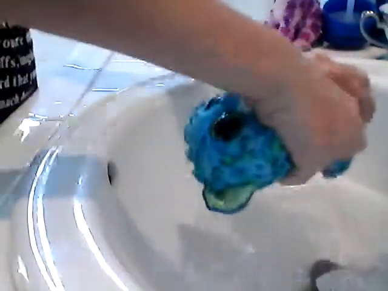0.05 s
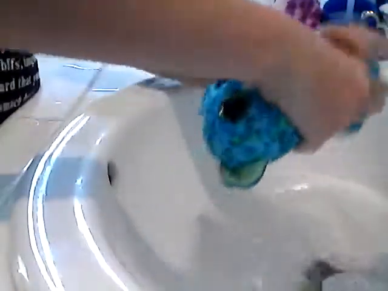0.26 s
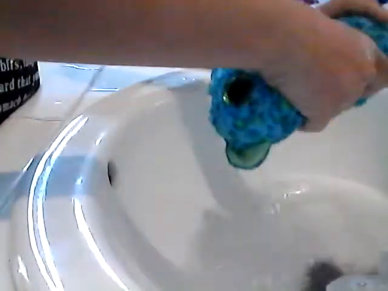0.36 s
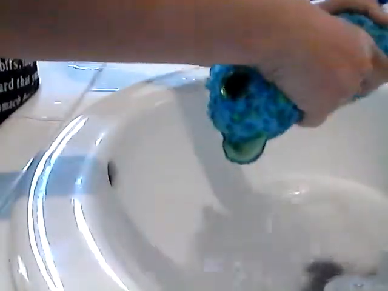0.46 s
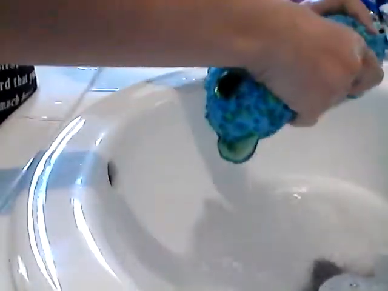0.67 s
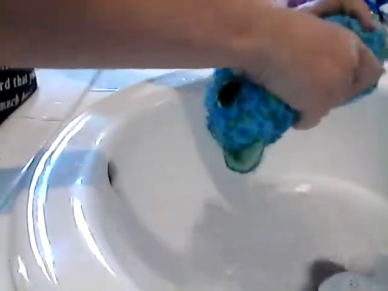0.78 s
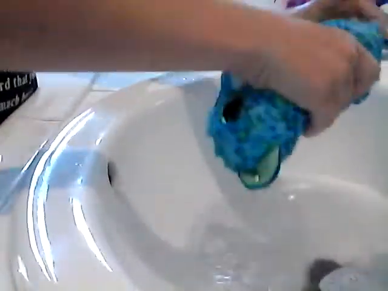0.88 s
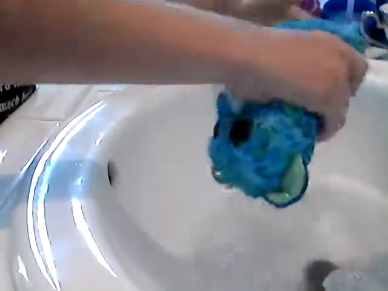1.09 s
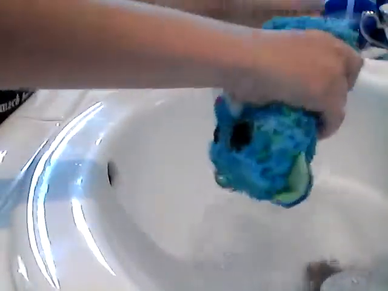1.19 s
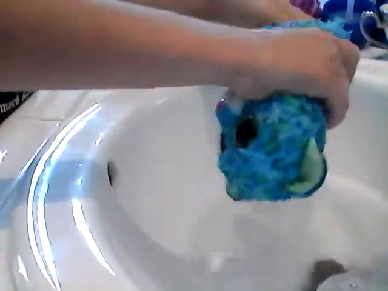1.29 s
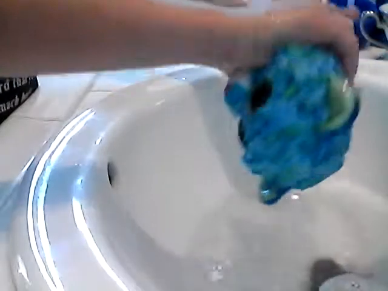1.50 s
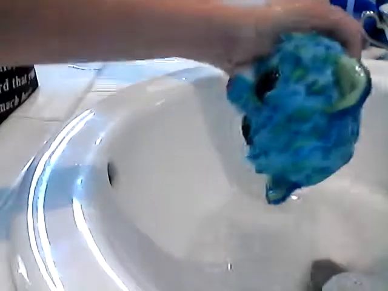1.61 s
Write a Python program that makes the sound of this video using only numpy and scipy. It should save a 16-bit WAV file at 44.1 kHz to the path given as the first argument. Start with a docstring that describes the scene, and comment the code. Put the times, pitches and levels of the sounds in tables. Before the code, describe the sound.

Water dribbles and plops from a squeezed wet plush toy into a bathroom sink.

```python
"""A wet plush toy is wrung out over a little water in the sink of a small, hard bathroom.
From the start, microphone hiss, hum and a thin whine lie under a faint ring and a dribble of droplets.
The fabric is squeezed and large drops fall: each traps an air bubble that resonates, most rising in pitch
as they near the surface, while fine spray ticks in the basin. After about a second the dribble thins to
single plops, and last come a soft bump and a small splash."""
import sys
import numpy as np
from scipy import signal
from scipy.fft import rfft, irfft
from scipy.io import wavfile

SR = 44100
rng = np.random.default_rng(int(sys.argv[2]) if len(sys.argv) > 2 else 0)


def wrap_up_sound(samples):
    """Save the sound to the file named by the first command line argument, as 16-bit audio."""
    columns = np.atleast_2d(samples).T
    # keep every value between -1 and 1, then stretch to whole-number steps
    tamed = np.clip(columns, -1, 1)
    steps = np.round(tamed * 32767).astype(np.int16)
    wavfile.write(sys.argv[1], SR, steps)


N = 72765
TIME = np.arange(N) / SR
AGE = np.arange(int(0.09 * SR)) / SR   # seconds since a drop landed


def from_db(db):
    """Amplitude ratio of a level in decibels."""
    return 10 ** (np.asarray(db) / 20)


def rms_one(x):
    """Normalisation to unit rms."""
    return x / np.sqrt(np.mean(x ** 2) + 1e-20)


def add(out, start_s, sound):
    """Superposition: a sound adds to the mix from start_s on."""
    i = int(np.clip(start_s * SR, 0, N - 1))
    out[i:i + len(sound)] += sound[:N - i]


def filtered(x, hz, kind, order=2):
    """Butterworth filter, maximally flat in its passband."""
    return signal.sosfilt(signal.butter(order, np.clip(hz, 10, .45 * SR), kind, fs=SR, output="sos"), x)


def decay(t, t60_s):
    """Exponential damping, by 60 dB in t60_s."""
    return np.exp(-np.log(1000) * t / t60_s)


# spectrum of the noise floor: frequency_hz, relative_density_db
NOISE_SPECTRUM = [(15, -69), (25, 3), (130, -2), (170, -1.5), (242, -3), (285, -5), (354, -6), (394, -6.5),
                  (1290, -14), (1400, -11), (3080, -17), (7710, -19.5), (10100, -22), (14800, -24),
                  (16000, -17)]
# mains hum and electrical whine: pitch_hz, level_db
HUM_TONES = [(60, -53.5), (110, -54.5), (8000, -52), (15000, -48.5)]
def background(noise_db=-41):
    """Stationary noise: room rumble and microphone hiss form a continuum, hum and whine a line spectrum."""
    corner_hz, density_db = np.transpose(NOISE_SPECTRUM)
    bin_hz = np.arange(N // 2 + 1) * SR / N
    colour = from_db(np.interp(np.log(bin_hz + 1), np.log(corner_hz), density_db))
    noise = rms_one(irfft(rfft(rng.standard_normal(N)) * colour, N))
    tones = sum(np.sqrt(2) * from_db(db) * np.sin(2 * np.pi * (hz * TIME + rng.random()))
                for hz, db in HUM_TONES)
    return from_db(noise_db) * noise + tones


# faint rings over the basin: start_s, pitch_hz, level_db, t60_s
RINGS = [(0, 2157, -48, 0.47), (0.215, 2647, -28, 0.23), (0.3025, 2160, -40, 0.65),
         (0.445, 1649, -19, 0.22)]
def lingering_rings(attack_s=0.002):
    """Lightly damped oscillation: thin tones swell quickly and die away slowly."""
    out = np.zeros(N)
    attack = 1 - np.exp(-TIME / attack_s)
    for start_s, hz, db, t60_s in RINGS:
        add(out, start_s, from_db(db) * attack * decay(TIME, t60_s) * np.sin(2 * np.pi * hz * TIME))
    return out


def bubble(hz, life_s, rise_octaves, t60_cycles=212, attack_s=0.00008):
    """Minnaert resonance: trapped air rings, gliding ever faster in pitch until the bubble surfaces."""
    life_spent = np.minimum(AGE / life_s, 2)
    pitch_hz = np.minimum(hz * 2 ** (rise_octaves * life_spent ** 2), SR / 2)
    attack = 1 - np.exp(-AGE / attack_s)
    surfacing = np.exp(-life_spent ** 4)
    envelope = attack * decay(AGE, t60_cycles / hz) * surfacing
    return envelope * np.cos(2 * np.pi * np.cumsum(pitch_hz) / SR)


def impact(band_hz, t60_s, order):
    """Impact noise: water striking water gives a brief burst with a broad spectrum."""
    return filtered(rng.standard_normal(len(AGE)) * decay(AGE, t60_s), band_hz, "band", order)


def tick(hz, fizz_db=-6, attack_s=0.00006):
    """Impulse excitation: a tiny droplet gives a very short ring and a puff of fizz."""
    ring = decay(AGE, t60_s=0.0041) * np.sin(2 * np.pi * hz * AGE)
    fizz = from_db(fizz_db) * impact(band_hz=(9830, 14400), t60_s=0.013, order=2)
    return (1 - np.exp(-AGE / attack_s)) * (ring + fizz)


def scatter(contour, per_s, base_db, low_hz, high_hz, spread_db=2):
    """Poisson process: random droplets (start_s, pitch_hz, gain) whose levels follow a contour."""
    start_s = TIME[rng.random(N) < per_s / SR]
    hz = low_hz * (high_hz / low_hz) ** rng.random(len(start_s))
    mean_db = base_db + np.interp(start_s, *np.transpose(contour))
    jitter_db = spread_db * np.clip(rng.standard_normal(len(start_s)), -2, 2)
    return zip(start_s, hz, from_db(mean_db + jitter_db))


# strength of the dribble: time_s, relative_level_db
FLOW = [(0.1, -5.5), (.18, -6), (.3, -1), (.41, -9.5), (.57, -5), (.66, -11), (.79, 2.5), (.88, -0.5),
        (.97, -5.5), (1.12, -13), (1.47, -20), (1.54, -5.5), (1.65, -10.5)]
def dribble(life_cycles=17.9):
    """Incoherent sources: many faint chirping bubbles and ticks of mist add up to a trickle."""
    out = np.zeros(N)
    for start_s, hz, gain in scatter(FLOW, per_s=260, base_db=-41.5, low_hz=1802, high_hz=4406):
        add(out, start_s, gain * bubble(hz, life_cycles / hz, rise_octaves=0.22))
    for start_s, hz, gain in scatter(FLOW, per_s=100, base_db=-33.5, low_hz=7860, high_hz=15750):
        add(out, start_s, gain * tick(hz))
    return out


# soft swells of noise: peak_s, half_width_s, level_db, low_hz, high_hz
SWELLS = [(0.181, 0.02, -38.5, 513, 860), (0.181, 0.012, -36.5, 1340, 5130), (0.782, 0.1, -47.5, 584, 850),
          (1.525, 0.02, -41.5, 161, 407), (1.569, 0.015, -35.5, 54.4, 147),
          (1.566, 0.045, -56.5, 1910, 6000)]
def soft_swells():
    """Amplitude-modulated noise: wet fabric handled, a low watery plop, a bump and a closing splash."""
    out = np.zeros(N)
    for peak_s, half_width_s, db, low_hz, high_hz in SWELLS:
        swell = np.exp(-((TIME - peak_s) / half_width_s) ** 2 / 2)
        noise = rms_one(filtered(rng.standard_normal(N), [low_hz, high_hz], "band"))
        out += from_db(db) * swell * noise
    return out


# large drops and their bubbles: start_s, pitch_hz, level_db, life_ms, rise_octaves, slap_re_bubble_db
DROPS = [ (0.1857, 3230, -22, 4.2, -0.16, -5), (.2138, 2760, -12, 1.86, -0.16, -14),
         (0.2235, 5580, -23, 3.4, -0.038, -1.5), (0.2735, 4310, -16.5, 3.9, 0.067, -10),
         (.3021, 2270, -21, 2.9, 0.057, -5), (0.4367, 1593, -11, 32, 0.06, -18),
         (0.4367, 1668, -10.5, 5.2, -0.046, -18.5), (0.469, 2470, -31.5, 18, 0.31, -30),
         (0.441, 4140, -26.5, 8.1, 0.22, -21), (.4470, 5450, -25, 1.8, 0.37, -6),
         (0.458, 1780, -23.5, 11, 0.38, -28), (0.4854, 6550, -25, 1.6, 0.15, -2.5),
         (0.5745, 4650, -16, 2.6, -0.051, -7), (0.5752, 3790, -20, 4.7, -0.11, -17),
         (.6000, 1396, -13.5, 8.5, 0.7, -48), (0.6148, 1291, -10.5, 12, 0.017, -19),
         (0.6148, 3586, -15, 7.8, 0.6, -9), (0.62, 1581, -11, 9.6, 0.017, -42),
         (0.633, 1687, -24, 13, 0.43, -30), (0.6647, 1770, -26, 3.1, 0.51, -19),
         (.6660, 2230, -33, 14, 0.37, -25), (0.6977, 1246, -25, 25, 0.37, -25),
         (.7120, 1156, -23.5, 9.5, -0.26, -21), (0.7059, 3690, -28.5, 3.9, 0.14, -2),
         (0.7192, 5050, -31, 8.2, -0.41, -8), (0.726, 1092, -30, 16, -0.14, -25),
         (0.737, 1095, -19.5, 8.4, 0.31, -24), (0.7488, 1100, -18.5, 11.4, 0.74, -35),
         (0.759, 1725, -28.5, 20, -0.17, -36), (0.7774, 1540, -21, 4.4, 0.2, -28),
         (0.781, 2440, -30.5, 13, 0.57, -20), (0.7825, 1481, -14, 6.5, 0.08, -33),
         (0.816, 2570, -32.5, 7.5, 0.4, -28), (0.8265, 2100, -26, 3, -0.2, -8),
         (0.8388, 1417, -21, 21, 0.28, -7.5), (0.8634, 1502, -26.5, 49, 0.37, -12),
         (0.872, 2390, -34, 4.4, 0.039, -20), (0.881, 3360, -30, 5.9, 0.013, -18),
         (0.9251, 4670, -32, 11, -0.24, -2), (0.9332, 3570, -28, 4.7, 0.22, -20),
         (.9350, 1800, -27.5, 4.5, 0.083, -9), (0.9449, 6170, -20, 1.45, -0.17, -8.5),
         (0.966, 2240, -33, 8, -0.00017, -20), (1.008, 4650, -33, 5, 0.19, -20),
         (1.031, 3270, -28, 4.5, -0.081, -17), (1.1299, 1388, -25.5, 16, 0.017, -31),
         (1.3229, 1745, -25, 5.4, 0.65, -16), (1.3228, 1289, -11, 25.2, -0.275, -19.5),
         (1.331, 3800, -29, 5.6, -0.35, -22), (1.581, 6320, -33.5, 2.7, 0.06, -4)]
def drops(low_cut_hz=1060, knock_db=-3.5, knock_band_hz=(470, 646)):
    """Air entrainment: each drop slaps the water and traps a bubble; the basin adds a hollow knock."""
    out = np.zeros(N)
    for start_s, hz, db, life_ms, rise_octaves, slap_db in DROPS:
        slap = from_db(slap_db) * impact(band_hz=(1520, 9900), t60_s=0.031, order=1)
        add(out, start_s, from_db(db) * (bubble(hz, life_ms / 1000, rise_octaves) + slap))
    knock = from_db(knock_db) * filtered(out, knock_band_hz, "band")
    return filtered(out, low_cut_hz, "high", order=4) + knock


# fine spray landing: start_s, pitch_hz, level_db
SPRAY_HITS = [ (0.2377, 12000, -17), (0.2937, 14800, -20.5), (0.322, 12200, -23), (.3325, 10900, -16.5),
              (0.3814, 8700, -24.5), (0.4858, 12600, -17), (0.5709, 8540, -14.5), (0.5736, 12600, -11.5),
              (0.614, 10900, -19), (0.6496, 11800, -5.5), (0.6512, 11950, -15), (.6625, 12000, -22),
              (.6870, 12500, -23), (0.707, 12500, -27), (0.7194, 9600, -22), (0.8188, 12500, -11),
              (.8638, 10350, -14), (.9630, 10600, -23), (.9926, 13300, -25), (1.060, 9800, -27),
              (1.0805, 10400, -19.5), (1.111, 12800, -31)]
def spray():
    """Short transients: fine spray strikes the wet basin in bright ticks."""
    out = np.zeros(N)
    for start_s, hz, db in SPRAY_HITS:
        add(out, start_s, from_db(db) * tick(hz))
    return out


# early reflections off the basin: delay_ms, gain
REFLECTIONS = [(.9, -0.12), (2.3, -0.085), (3.6, -0.15), (13.4, 0.2)]
def room(x, crossover_hz=4400, build_up_s=0.007):
    """Reverberation: close reflections, then the bathroom's diffuse tail, shorter in the treble."""
    early = np.zeros(N)
    for delay_ms, gain in REFLECTIONS:
        add(early, delay_ms / 1000, gain * x)
    t = TIME[:SR // 2]
    onset = np.clip(t / build_up_s - 0.5, 0, 1)
    tail = np.zeros(len(t))
    for kind, t60_s, db in (("low", 0.33, -9), ("high", 0.27, -9.5)):
        echoes = rng.standard_normal(len(t)) * decay(t, t60_s) * onset
        tail += from_db(db) * filtered(echoes / np.linalg.norm(echoes), crossover_hz, kind)
    return early + signal.fftconvolve(x, tail)[:N]


def scene():
    """Superposition of all sources in one channel; only drops, spray and dribble excite the room."""
    noises = background() + soft_swells()
    water = drops() + spray() + dribble()
    return (noises + water + room(water) + lingering_rings())[None]


def record(dry, cutoff_hz=15900):
    """Band limiting: a steep elliptic low-pass removes the highest treble."""
    return signal.sosfilt(signal.ellip(10, 0.1, 80, cutoff_hz, fs=SR, output="sos"), dry)


dry = scene()
out = record(dry)
wrap_up_sound(out)
```